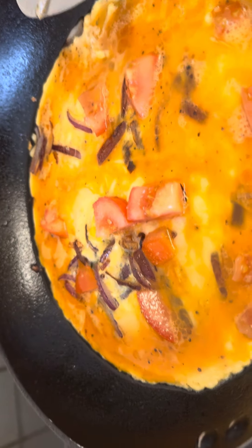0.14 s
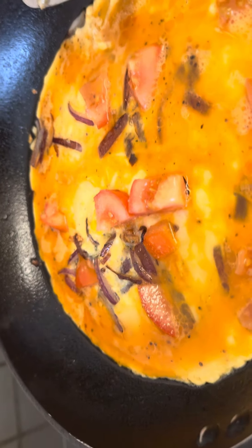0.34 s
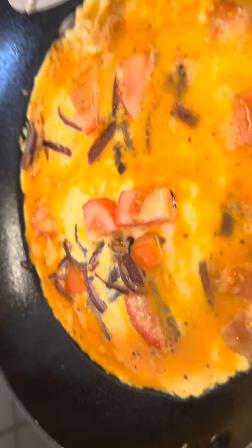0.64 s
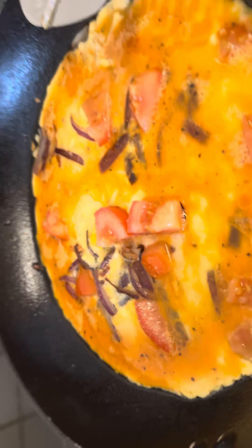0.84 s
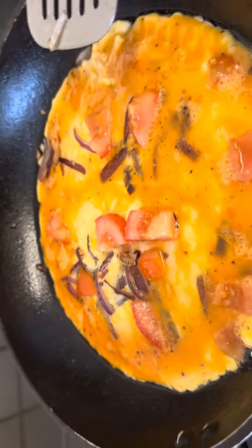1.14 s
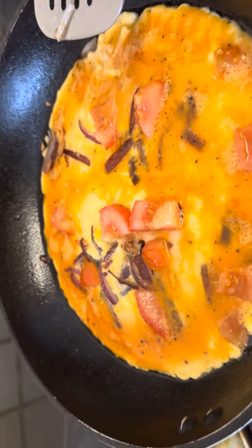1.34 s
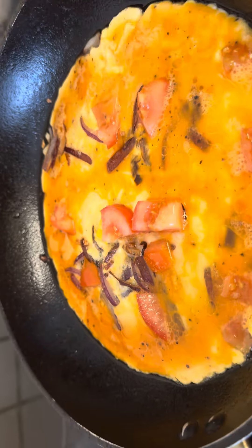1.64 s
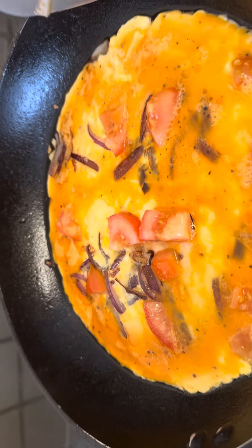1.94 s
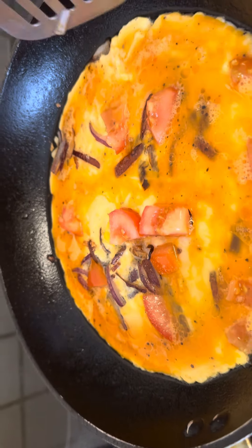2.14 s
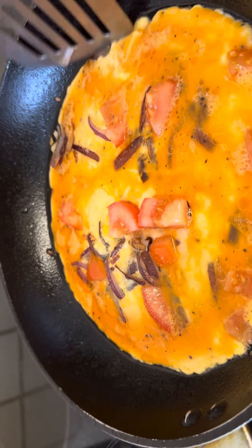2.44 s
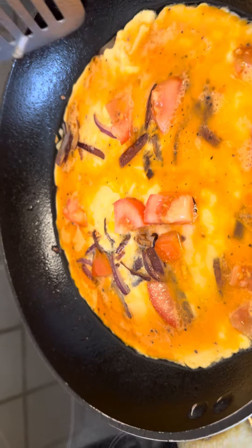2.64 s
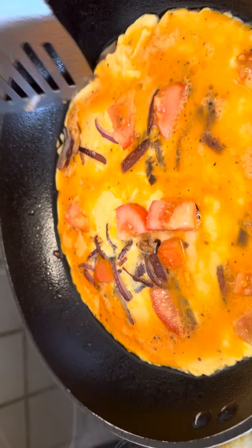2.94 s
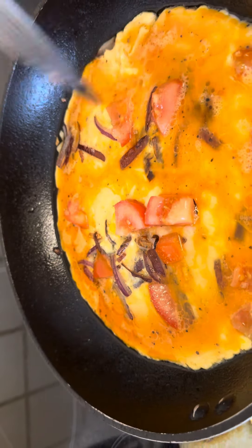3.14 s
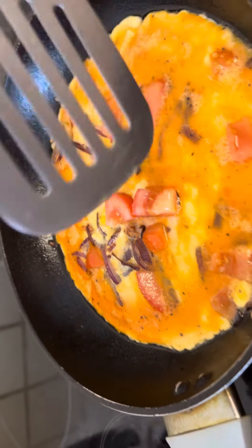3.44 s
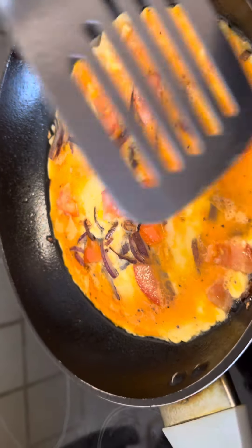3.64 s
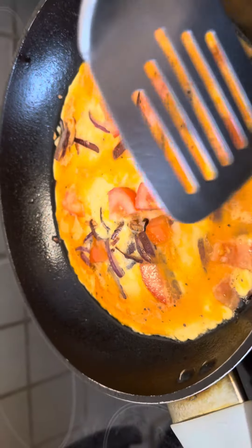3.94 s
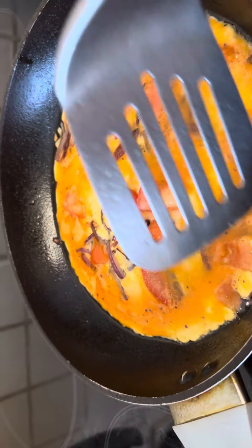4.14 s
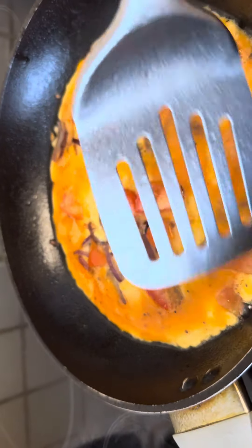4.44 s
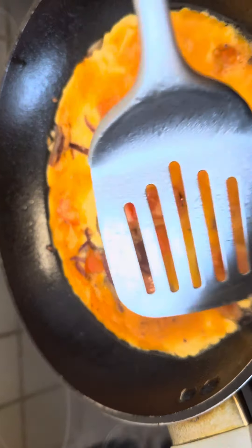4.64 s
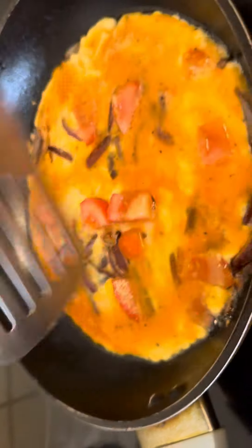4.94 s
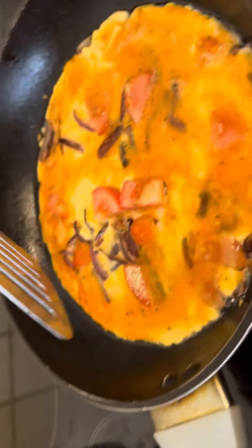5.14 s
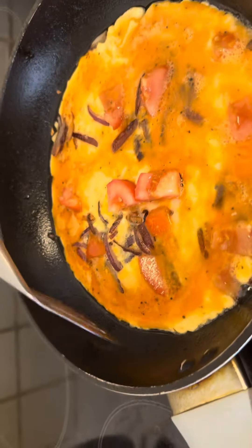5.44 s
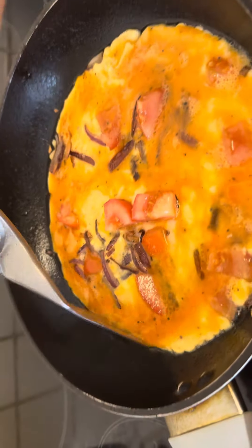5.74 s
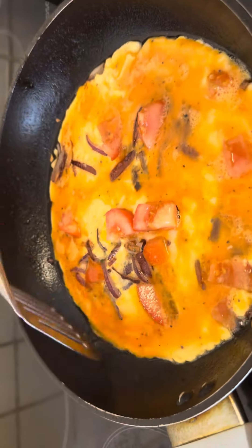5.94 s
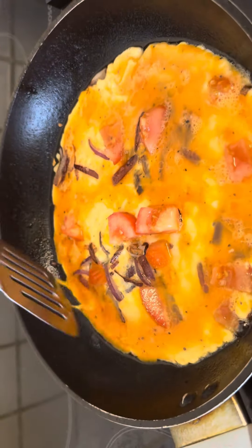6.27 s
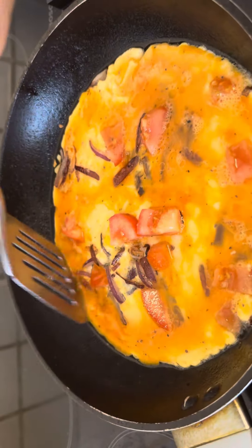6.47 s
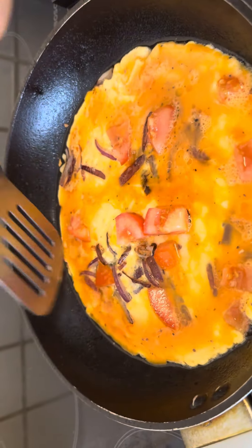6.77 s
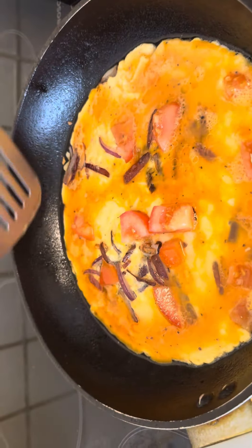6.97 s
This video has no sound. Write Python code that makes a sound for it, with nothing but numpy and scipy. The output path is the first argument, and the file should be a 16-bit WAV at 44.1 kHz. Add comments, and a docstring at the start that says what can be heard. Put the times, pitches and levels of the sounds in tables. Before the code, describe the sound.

Steady light sizzling with small snaps and spits, heard very close in stereo, above a dull electrical hum and soft fan. After about two seconds of mostly frying, a spatula taps the pan in clusters, with brief gritty scrapes under the egg and dull thumps of the pan on the hob. The last knocks are loudest, then frying alone.

```python
"""An omelette fries in a nonstick pan in a small kitchen: steady hob hum (sines) and fan rush (noise) run
throughout, under sizzle made of flickering noise bands, random clicks and pings. Low bumps, dry ticks, a
noise brush and bubble pops (snap, ping, spit) start within 0.3 s. From 2 s a slotted spatula knocks on the pan
(pulses into ringing modes), clinks once and scrapes under the egg (stick-slip clicks) until just before the end.
Two close microphone ports hear the low end alike and the top treble near opposite phase."""
import sys
import numpy as np
from scipy import signal
from scipy.fft import rfft, irfft, next_fast_len
from scipy.io import wavfile

SR = 44100
rng = np.random.default_rng(int(sys.argv[2]) if len(sys.argv) > 2 else 0)


def dump_mix(stems):
    """Bounce the given channels to the path in sys.argv[1] as a 16-bit WAV at rate SR."""
    frames = np.atleast_2d(stems).T  # one column per channel
    limited = np.clip(frames, -1, 1)  # hard clip at full scale
    pcm = np.round(limited * 32767).astype(np.int16)
    wavfile.write(sys.argv[1], SR, pcm)


N = 313551
TIME = np.arange(N) / SR
TAPS = 8192
BINS = np.fft.rfftfreq(TAPS, 1 / SR)

# Event-table levels are relative: each function adds its own trim.
# strokes of the blade under the egg: (start [s], length [s], level [dB], centre of the rubbing noise [Hz],
# pitch of the blade's song [Hz], song [dB], edge scratch [dB], low pan shudder [dB], shift of the frying [dB])
STROKES = [(2.306, 0.12, -38, 600, 480, -2, -14, -38, -1), (2.632, 0.13, -38, 547, 513, -8, -24, -50, 0.5),
           (2.74, 0.11, -30, 700, 490, -16, -22, -48, 1.5),
           (3.774, 0.058, -36, 420, 520, -12, -23, -40, -1.5),
           (3.854, 0.085, -28, 380, 440, -5, -22.5, -35, 12),
           (4.537, 0.077, -29, 380, 430, -11, -33, -33, 1.5),
           (5.681, 0.05, -23, 456, 457, -6.5, -12.5, -28, 0.5)]
# how strongly the pan radiates a push: (frequency [Hz], level [dB])
PAN_RADIATION = [(25, -2), (60, 8.5), (140, 9.5), (230, 7), (330, 2.5), (480, 5.5), (600, 2), (790, 1.5),
                 (1030, 0), (1450, 0), (1900, -2), (2600, -6), (3200, -11.5), (6000, -31)]
# the spatula works at the far wall, then on the egg, then at the near wall: the two moves (time [s])
MOVE_TIMES_S = (3.3, 5.0)


def amp(db):
    """Decibels to gain."""
    return 10 ** (np.asarray(db) / 20)


def evened(x):
    """Scales to rms 1."""
    return x / np.sqrt(np.mean(x ** 2) + 1e-20)


def peaked(x):
    """Scales to peak 1."""
    return x / np.max(abs(x))


def read(points, hz):
    """Reads a table on a log-frequency axis."""
    f, value = np.transpose(points)
    return np.interp(np.log(hz + 1), np.log(f + 1), value)


def add(mix, s, sound):
    """Mixes a sound in at time s."""
    part = mix[..., max(round(s * SR), 0):][..., :sound.shape[-1]]
    part += sound[..., :part.shape[-1]]


def panned(x, left_db):
    """A sound louder at one port than at the other by left_db."""
    return amp([[left_db / 2], [-left_db / 2]]) * x


def convolve(x, response):
    """Passes a sound through an impulse response, keeping its length."""
    return signal.fftconvolve(x, response)[:len(x)]


def causal(db):
    """Minimum-phase spectrum with these levels on BINS, floored 80 dB below the top."""
    log_gain = np.log(amp(np.maximum(db, db.max() - 80)))
    mirrored = np.r_[log_gain, log_gain[-2:0:-1]]
    return np.exp(np.conj(signal.hilbert(mirrored)))[:len(BINS)]


def band(x, low_hz, high_hz):
    """A band of a sound, at rms 1."""
    sos = signal.butter(3, [low_hz, high_hz], "band", fs=SR, output="sos")
    return evened(signal.sosfilt(sos, x))


def resonate(x, hz, width):
    """A resonance of gain 1, width in Hz, whose pitch can follow a curve."""
    turn = np.exp(2j * np.pi * np.cumsum(hz * np.ones(len(x))) / SR)
    r = np.exp(-np.pi * width / SR)
    # shift the pitch to 0 Hz, low-pass, shift back
    return 2 * (turn * signal.lfilter([1 - r], [1, -r], x / turn)).real


def dying(t, t60):
    """An envelope that falls 60 dB in t60."""
    return np.exp(-np.log(1000) * t / t60)


def ring(modes):
    """Half a second of struck modes (Hz, dB, t60 s)."""
    t = TIME[:SR // 2]
    return sum(amp(db) * dying(t, t60) * np.cos(2 * np.pi * hz * t) for hz, db, t60 in modes)


def drift(per_s):
    """A slow random curve of rms 1 with per_s knots a second."""
    knots = np.arange(0, TIME[-1] + 1, 1 / per_s)
    return evened(np.interp(TIME, knots, rng.standard_normal(size=2000)[:len(knots)]))


def grains(per_s, spread_db):
    """Random clicks at rms 1; their sizes spread exponentially in dB."""
    size = amp(spread_db * np.minimum(rng.exponential(1, N), 5)) * rng.choice([-1, 1], N)
    return evened(size * (rng.random(N) < per_s / SR))


def scattered(*ranges, count):
    """Event rows at random times, each further column drawn from its range."""
    low, high = np.transpose([(0, TIME[-1]), *ranges])
    return (low + (high - low) * rng.random((count, len(low)))).tolist()


def echoes(decay, gap_s):
    """Dense reflections of energy 1, each band dying at its own speed."""
    hz, t, z = signal.stft(rng.standard_normal(SR // 2), SR, nperseg=256)
    tail = signal.istft(z * dying(t, read(decay, hz)[:, None]), SR, nperseg=256)[1]
    tail *= 1 - np.exp(-(TIME[:len(tail)] / gap_s) ** 2)
    return tail / np.linalg.norm(tail)


def kitchen(x, wet_db, apart_db):
    """Adds the room: a reverberation both ports share, and one of opposite sign at each."""
    # reverberation: (frequency [Hz], t60 [s])
    room_t60 = [(80, 0.24), (300, 0.26), (1000, 0.26), (3000, 0.26), (7000, 0.3), (15000, 0.0069)]
    source = np.atleast_2d(x).mean(axis=0)
    shared, apart = (convolve(source, echoes(room_t60, gap_s=0.00027)) for _ in range(2))
    return x + amp(wet_db) * (shared + amp(apart_db) * np.array([apart, -apart]))


def hob():
    """Hum partials wavering in phase and level, in the coloured-noise rush of a fan."""
    # hum of the hob and its fan: (frequency [Hz], level [dB rms])
    hum_partials = [(100, -52.5), (152, -55.5), (200, -64), (241, -62), (457, -73.5), (495, -83.5)]
    # rush of the fan: (frequency [Hz], relative density [dB per Hz])
    fan_colour = [(20, -30.5), (35, -21), (50, 5), (72, 1.5), (125, -3.5), (170, 2), (245, -1.5),
                  (275, -4.5), (380, -14.5), (510, -7), (600, -21.5), (1000, -18), (2000, -51), (5000, -79)]
    hum = 0
    for hz, db in hum_partials:
        phase = 2 * np.pi * hz * TIME + 0.91 * drift(per_s=3.9)
        hum = hum + amp(db) * evened(np.sin(phase) * amp(1.66 * drift(per_s=6)))
    rush = evened(convolve(rng.standard_normal(N), irfft(causal(read(fan_colour, BINS)))))
    return hum + kitchen(amp(-55.0) * rush, wet_db=-4.5, apart_db=-1.0)


def fizz():
    """Fine hiss of steam: noise that flickers separately in every band."""
    edges_hz = np.linspace(200, 16400, num=15)
    return evened(sum(band(rng.standard_normal(N), low, high) * amp(2.7 * drift(per_s=40))
                      for low, high in zip(edges_hz, edges_hz[1:])))


def bubbles():
    """Swarms of tiny bubbles, each size pinging for some cycles at its own pitch."""
    t = TIME[:TAPS // 16]
    swarms = 0
    for hz in np.geomspace(4800, 10500, num=8):
        ping = np.sin(2 * np.pi * hz * t) * dying(t, t60=38 / hz)
        swarms = swarms + signal.oaconvolve(grains(per_s=31, spread_db=0.0), ping)[:N]
    return evened(swarms)


def frying_db(shift_rise_s=0.049, shift_fade_s=0.14):
    """The frying swells slowly; each stroke pressing wet egg on the hot pan briefly flares or dips it."""
    # slow swell: (time [s], relative level [dB])
    heat = [(0.0, -59), (0.45, -56.5), (1.25, -61.5), (2.25, -58.5), (3.1, -60), (3.3, -62.5), (3.7, -61.5),
            (4.05, -60), (4.8, -58.5), (5.5, -56), (7.11, -57)]
    db = np.interp(TIME, *np.transpose(heat))
    for s, length, *_, shift_db in STROKES:
        t = np.maximum(TIME - s, 0)
        fade = np.exp(-(np.maximum(t - length, 0) / shift_fade_s) ** 2)
        db = db + shift_db * (1 - np.exp(-t / shift_rise_s)) * fade
    return db


def sizzle():
    """A fine fizz of steam, a crackle of bursting films and tiny bubble pings, rung by hollows."""
    # colour of the frying: (frequency [Hz], relative density [dB per Hz])
    fry_colour = [(300, 7), (1000, -3), (2300, -1.5), (3600, -5), (5600, -4.5), (7500, -0.5), (9300, -2.5)]
    # its faint top octave: (frequency [Hz], relative density [dB per Hz])
    top_colour = [(10600, -3), (12000, -10), (13300, -8), (15600, -7), (16200, -24)]
    # hollows under the egg that the frying rings: (frequency [Hz], width [Hz], level [dB])
    hollows = [(4960, 61, -17), (6270, 980, -3.5)]
    crackle = grains(per_s=540, spread_db=7.0)
    fry = fizz() + amp(-5.5) * crackle + amp(-11.5) * bubbles()
    fry = fry + sum(amp(db) * resonate(fry, hz, width) for hz, width, db in hollows)
    fry = evened(convolve(fry, irfft(causal(read(fry_colour + top_colour, BINS)))))
    return kitchen(fry * amp(frying_db() + 1.0), wet_db=-21.5, apart_db=-40.0)


def bumps():
    """Dull, soft bumps: a few slow cycles each under a Gaussian envelope."""
    # (envelope peak [s], level [dB], pitch [Hz])
    low_bumps = [(0.024, -44, 85), (0.47, -44.5, 90), (0.526, -44, 66), (0.595, -36, 72.5), (0.66, -44, 70),
                 (2.265, -38.5, 64)]
    width_s = 0.019
    out = 0
    for s, db, hz in low_bumps:
        t = TIME - s
        out = out + amp(db) * np.exp(-(t / width_s) ** 2) * np.sin(2 * np.pi * hz * t)
    return out


def ticks():
    """Short dry clicks that crumble for a few milliseconds, with no ring."""
    # from the setting egg: (time [s], level [dB], centre [Hz], spread [octaves])
    egg_ticks = [(0.138, -27.5, 610, 0.9), (0.399, -35.5, 450, 0.6), (0.652, -38, 1120, 0.16),
                 (0.746, -35, 2450, 0.36), (0.857, -37.5, 580, 0.55), (1.053, -35, 600, 0.68),
                 (1.173, -35.5, 4000, 0.73), (1.219, -39.5, 1680, 0.66), (1.7346, -27.5, 2720, 0.54),
                 (1.788, -42, 1500, 0.7), (1.935, -41.5, 1090, 0.4), (4.851, -32.5, 785, 1.1),
                 (4.919, -38.5, 596, 0.72), (5.145, -27.5, 680, 1.18), (5.298, -25.5, 3160, 0.98),
                 (6.151, -31.5, 2580, 0.3)]
    out, t = np.zeros(N), TIME[:TAPS]
    for s, db, hz, octaves in egg_ticks:
        colour_db = -9 * np.hypot(1, np.log2((BINS + 1) / hz) / max(octaves, .2)) ** 0.95
        click = peaked(irfft(causal(colour_db)))
        crumble = rng.standard_normal(TAPS) * dying(t, t60=0.022)
        crumbled = convolve(click, crumble / np.linalg.norm(crumble))
        add(out, s, amp(db - 4.5) * (click + amp(-1.0) * crumbled))
    return kitchen(out, wet_db=-11, apart_db=-7.5)


def brush():
    """The blade brushes the egg lightly, once: a noise swish that rises quickly and dies away."""
    start_s, level_db, rise_s, t60_s = 0.242, -45, 0.025, 0.33
    t = np.maximum(TIME - start_s, 0)
    swish = band(rng.standard_normal(N), low_hz=870, high_hz=3300)
    return amp(level_db) * np.minimum(t / rise_s, 1) * dying(t, t60_s) * swish


def pops():
    """A film snaps and spits, and the bubble's hollow pings for a few milliseconds."""
    # larger bubbles in the fat: (time [s], level [dB], pitch [Hz], ring width [Hz], film snap [dB])
    large_pops = [(0.259, -32, 7260, 3000, -40.5), (0.609, -39, 4930, 800, -54),
                  (0.7468, -22, 5570, 1490, -41), (0.757, -32, 6000, 3000, -41),
                  (0.9733, -32, 6260, 500, -68), (1.581, -35, 4850, 500, -37),
                  (1.71, -42, 7100, 3000, -35.5), (1.7337, -29.5, 3920, 560, -54),
                  (2.306, -31.5, 8300, 2000, -45), (2.3907, -22, 6160, 2230, -67),
                  (2.81, -28.5, 5250, 910, -77), (2.9327, -28, 5230, 1100, -60),
                  (3.0181, -29, 6440, 2500, -37), (3.065, -29, 5240, 710, -50),
                  (3.184, -37, 5400, 910, -48), (3.7743, -32.5, 3720, 1500, -53),
                  (4.0968, -35, 6100, 1200, -41), (4.76, -39, 6940, 1480, -43),
                  (4.8922, -57, 8650, 1500, -37), (5.021, -52, 9050, 1500, -41),
                  (5.078, -38, 7250, 600, -62), (5.438, -33, 6630, 1400, -39),
                  (5.592, -37, 7000, 2940, -35), (5.609, -29, 5700, 3000, -31.5),
                  (5.7, -24.5, 5150, 1100, -65), (5.81, -30.5, 7440, 1600, -46),
                  (5.869, -34, 2700, 3000, -48), (6.002, -31, 6400, 600, -68),
                  (6.209, -22.5, 3970, 2240, -43), (6.248, -32, 4660, 1800, -44),
                  (6.346, -30, 4780, 260, -47), (6.7685, -34.5, 8350, 1200, -41),
                  (6.816, -30.5, 7700, 1110, -47), (6.859, -25, 4720, 554, -40)]
    # smaller bubbles at random: ranges of level [dB], pitch [Hz], ring width [Hz], film snap [dB]
    small_pops = scattered((-58, -39), (4800, 8800), (400, 1500), (-72, -58), count=36)
    # film snap: (frequency [Hz], relative level [dB])
    snap_colour = [(600, -15), (2500, -2.0), (6000, 2.0), (9000, 11.5), (12000, -6.0), (16000, 8.5)]
    out, t = np.zeros((2, N)), TIME[:TAPS // 4]
    snap = peaked(irfft(causal(read(snap_colour, BINS))))
    for s, db, hz, width, snap_db in large_pops + small_pops:
        ping = peaked(np.sin(2 * np.pi * hz * t) * t * np.exp(-np.pi * width * t / 2))
        spit = rng.standard_normal(len(t)) * dying(t, t60=0.022)
        spit = peaked(resonate(resonate(spit, hz, width), hz, width=2 * width))
        add(out, s + 0.00029, amp(db - 10.5) * (ping + amp(4.0) * spit))
        add(out, s + 0.00027, panned(amp(snap_db + 12.0) * snap, left_db=rng.choice([-1, 1]) * 6.7))
    return kitchen(out, wet_db=-11.0, apart_db=-2.5)


def blow(hz, octaves, dip_hz, slope_db=9):
    """A contact pulse spread by the pan, high bending waves before low: (modal drive, direct sound)."""
    # pitches the contact point leaves out: (multiple of the lowest, depth [dB], half width [octaves])
    dips = [(1, -19, 0.16), (2.08, -11, 0.11), (3.6, -12, 0.09)]
    dip_share_in_drive = 0.23
    distance = np.log2((BINS + 1) / hz) / max(octaves, .2)
    db = -slope_db * (np.hypot(1, distance) ** 0.74 - 1) + read(PAN_RADIATION, BINS)
    dip_db = sum(depth * np.exp(-(np.log2((BINS + 1) / (k * dip_hz)) / wide) ** 2) for k, depth, wide in dips)
    delay_s = 0.001882 * 1000 / (BINS + 70)
    spread = np.exp(-2j * np.pi * np.cumsum(delay_s) * SR / TAPS)
    return peaked(irfft(np.array([causal(db + dip_share_in_drive * dip_db), causal(db + dip_db)]) * spread))


def bounce(s):
    """The pan, struck at time s, bounces once on the hob and rocks to rest."""
    # bounce: (frequency [Hz], level struck at far wall [dB], on egg [dB], at near wall [dB])
    bounce_modes = [(59.3, -5, -6, -18), (79.8, 1, -9, 1), (133.8, -0.5, 10, 1.5)]
    # rocking on afterwards: (frequency [Hz], level [dB], t60 [s])
    rocking = [(46, -22, 0.35), (81, -9, 0.27), (135, -14, 0.22)]
    t, place = TIME[:SR // 2], np.searchsorted(MOVE_TIMES_S, s)
    rise, since = t / 0.021, t - .031
    thump = sum(amp(levels[place]) * np.cos(2 * np.pi * hz * since) for hz, *levels in bounce_modes)
    rock = sum(amp(db) * dying(since, t60) * np.cos(2 * np.pi * hz * since) for hz, db, t60 in rocking)
    return peaked(thump * (rise * np.exp(1 - rise)) ** 4 + rock * (1 - np.exp(-rise ** 2)))


def pan_ring(push, s):
    """The pan's modes answer a push at time s, weighted by place and varied at random."""
    # modes: (frequency [Hz], t60 [s], level struck at far wall [dB], on egg [dB], at near wall [dB])
    pan_modes = [(197, 0.25, 0, 1, -7), (234, 0.25, -2, 2, -12), (263, 0.28, 2, -9, -1),
                 (313, 0.28, -3, 0, 2), (365, 0.32, 8, 0, 7), (436, 0.26, -12, 3, 1),
                 (460, 0.22, -4, -14, 3), (492, 0.18, 5, -6, -14), (521, 0.17, 2, 4, -18),
                 (595, 0.22, 4, -6, -5), (635, 0.18, -8, 2, -10), (675, 0.24, -6, -4, -5),
                 (733, 0.17, 0, -8, 3), (776, 0.14, 5, 12, 1), (832, 0.11, -8, -1, 0),
                 (880, 0.1, -6, -3, 0), (1112, 0.22, -2, -5, -12), (1204, 0.24, -6, -14, -6),
                 (1389, 0.3, -4, 1, -11), (1448, 1.1, -8, -12, -14), (1714, 0.13, -12, -10, -4),
                 (1785, 0.16, -6, -12, -5), (2180, 0.15, 0, -4, -4), (2450, 0.14, 8, -8, -1),
                 (3010, 0.1, 0, 2, 4)]
    # dense, well damped modes of the loaded pan: (frequency [Hz], t60 [s])
    dense_t60 = [(150, 0.28), (800, 0.097), (3000, 0.056)]
    # their level: (at far wall [dB], on egg [dB], at near wall [dB])
    dense_levels_db = (-8.5, -9.5, -8.5)
    push, place = np.r_[push, np.zeros(SR // 2)], np.searchsorted(MOVE_TIMES_S, s)
    modes = [(hz, levels[place] + rng.uniform(-4, 3), t60) for hz, t60, *levels in pan_modes]
    shared, apart = (convolve(push, echoes(dense_t60, gap_s=0.0033)) for _ in range(2))
    dense = shared + amp(-2.5) * np.array([apart, -apart])
    return amp(-55.0) * convolve(push, ring(modes)) + amp(dense_levels_db[place]) * dense


def pressure_db(t, length):
    """Blade pressure t seconds into a stroke: bites in from a light touch, holds, lets go."""
    touch_db, bite_s, release_db_per_s = -30.5, 0.027, 506
    return touch_db * np.exp(-np.maximum(t, 0) / bite_s) - release_db_per_s * np.maximum(t - length, 0)


def scrapes():
    """The edge sticks, slips and chatters under the egg; on release the noise darkens and the pan jolts."""
    # resonances of the blade pressed on the pan: (frequency [Hz], width [Hz], relative level [dB])
    pressed_blade = [(1630, 72, -9), (1820, 420, 7), (2330, 120, 1)]
    catches_per_s, chatter_db = 45, -1
    sag_octaves_per_s = 25.5
    tremble_db, jolt_lag_s, jolt_s = -12, 0.0281, 0.0034
    out = np.zeros((2, N))
    chatter = np.sin(2 * np.pi * np.cumsum(catches_per_s * (1 + 0.353 * drift(per_s=30))) / SR)
    grip = amp(2.2 * drift(per_s=170))
    slips = grip * amp(chatter_db * chatter) * grains(per_s=520, spread_db=1.3)
    slips = convolve(slips, irfft(causal(read(PAN_RADIATION, BINS))))
    scratch = sum(amp(db) * resonate(slips, hz, width) for hz, width, db in pressed_blade)
    scratch = band(scratch, low_hz=1160, high_hz=2520)
    shudder = band(slips, low_hz=45, high_hz=226)
    for s, length, db, hz, song_hz, song_db, scratch_db, low_db, _ in STROKES:
        t = TIME[:int(length * SR) + TAPS // 2]
        at = int(s * SR) + np.arange(len(t))
        press = amp(pressure_db(t, length))
        sag = 2 ** (-sag_octaves_per_s * np.maximum(t - length, 0))
        body = evened(resonate(resonate(slips[at], hz * sag, width=1200), hz * sag, width=900))
        song = evened(resonate(resonate(slips[at], song_hz * sag, width=44), song_hz * sag, width=580))
        rub = body + amp(song_db) * song + amp(scratch_db) * evened(scratch[at])
        # the pan trembles under the push, then jolts back just after the release
        jolt = amp(tremble_db) * np.sqrt(press) + np.exp(-((t - length - jolt_lag_s) / jolt_s) ** 2)
        stroke = amp(db - 3.0) * press * rub + amp(low_db - 3.0) * jolt * evened(shudder[at])
        stroke = stroke * signal.windows.tukey(len(t), .08)
        add(out, s, stroke)
        add(out, s, amp(-7.0) * pan_ring(stroke, s))
    return out


def spatula():
    """Brush, knocks, a clink and scrapes; knocks and scrapes ring the pan, knocks bounce it on the hob."""
    # blows and catches: (time [s], blow [dB], spectrum centre [Hz], spread [octaves], lowest pitch left out [Hz],
    # thump of the pan on the hob [dB], edge tick [dB], freedom of the pan's ring [dB])
    knocks = [(2.038, -31, 1670, 2.3, 1270, -42, -34.5, 8.5),
              (2.425, -21.5, 410, 0.42, 795, -35.5, -61, -8),
              (2.6228, -16, 1860, 0.38, 1025, -37, -47, -0.5), (2.627, -32, 514, 0.68, 352, -53, -46, 14),
              (2.757, -28.5, 620, 0.45, 1500, -54, -59, 1), (2.779, -23.5, 650, 0.45, 930, -39, -52, 0),
              (2.843, -32, 690, 0.57, 1050, -31, -69, 15), (2.861, -31, 227, 0.51, 596, -38.5, -80, 3),
              (2.945, -24, 1560, 0.94, 960, -46, -42, 5), (3.019, -18, 2420, 0.8, 844, -46.5, -51, -27),
              (3.742, -27.5, 456, 0.66, 840, -47, -60.5, 5.5), (3.814, -36.5, 590, 0.5, 990, -41, -63, -4),
              (3.887, -28.5, 430, 0.32, 885, -51, -73, 9), (3.918, -20.5, 300, 0.91, 850, -35.5, -48, -1.5),
              (4.269, -14.5, 330, 2.3, 865, -51, -45.5, 3), (4.292, -15, 382, 0.93, 1160, -45, -48.5, -8),
              (4.509, -13.5, 535, 0.84, 626, -39.5, -48.5, 3), (4.594, -22, 394, 0.26, 1110, -49, -57, -2),
              (4.63, -20, 470, 0.41, 606, -43, -62, -2.5), (5.576, -20, 740, 0.61, 526, -26.5, -51, 0),
              (5.703, -30, 597, 0.51, 1490, -55, -60, 5), (5.717, -23, 940, 0.72, 1200, -57, -47, 4.5),
              (5.739, -10, 464, 0.55, 990, -33, -38, -31), (5.977, -13, 810, 0.51, 495, -26.5, -34.5, 2.5),
              (6.108, -22, 418, 0.41, 1040, -35.5, -52.5, -9.5),
              (6.3, -11, 737, 0.43, 530, -25.5, -33.5, -2), (6.4161, -5, 684, 0.93, 1060, -34.5, -33, -7.5),
              (6.604, -5.5, 810, 0.44, 539, -28, -41.5, -1.5)]
    # the free blade clinks on the rim: (time [s], level [dB])
    clinks = [(2.039, -37)]
    # modes of the free blade: (frequency [Hz], level [dB], t60 [s])
    blade_modes = [(1125, -13, 0.2), (1564, 1, 0.1), (1810, 12, 0.032), (2062, -9, 0.13), (2455, -3, 0.12),
                   (2649, -10, 0.12), (3009, -11, 0.12), (4081, -3, 0.05), (4380, -1, 0.04),
                   (5620, -8, 0.11), (6040, 8, 0.023), (6422, -11, 0.12), (6934, -15, 1.1),
                   (7736, -15, 0.16)]
    # edge tick: (frequency [Hz], relative level [dB])
    edge_colour = [(1500, 11.5), (3200, 5.0), (6200, 8.5), (8500, 5.5), (15000, -14.0)]
    out, t = scrapes() + brush(), TIME[:TAPS]
    edge = irfft(causal(read(edge_colour, BINS)))
    for s, db, hz, octaves, dip_hz, thump_db, tick_db, ring_db in knocks:
        push, direct = amp(db - 5.5) * blow(hz, octaves, dip_hz)
        crunch = peaked(convolve(rng.standard_normal(TAPS) * t * dying(t, t60=0.02), edge))
        add(out, s, direct)
        add(out, s, amp(thump_db + 6.5) * bounce(s))
        add(out, s, panned(amp(tick_db + 12.0) * crunch, left_db=rng.choice([-1, 1]) * 3.8))
        add(out, s, amp(ring_db) * pan_ring(push, s))
    for s, db in clinks:
        add(out, s, amp(db) * ring(blade_modes))
    return kitchen(out, wet_db=-12, apart_db=-6.0)


def scene():
    """Everything at the stove."""
    return hob() + sizzle() + bumps() + ticks() + pops() + spatula()


def record(dry):
    """The ports hear the bass alike and the top treble near opposite phase; then the band limits."""
    # nominal phase by which the left port leads: (frequency [Hz], phase [rad])
    port_phase = [(20, 0), (600, -.2), (1300, .1), (4900, .15), (6200, -.7), (7600, -1.4), (9000, -2.05),
                  (10500, -2.9), (12000, -3.14), (14000, -3.3), (15600, -4.0)]
    low_cut_hz, high_cut_hz = 33, 16400
    size = next_fast_len(N + TAPS)
    hz = np.fft.rfftfreq(size, 1 / SR)
    left, right = rfft(dry, size)
    apart = hz ** 2 / (hz ** 2 + 260 ** 2)  # fades port differences out in the bass
    mid, side = (left + right) / 2, apart * (left - right) / 2
    turn = np.exp(.5j * apart * read(port_phase, hz))
    ports = irfft(np.array([(mid + side) * turn, (mid - side) / turn]), size)[:, :N]
    ports = signal.sosfilt(signal.butter(4, low_cut_hz, "high", fs=SR, output="sos"), ports)
    low_pass = signal.firwin(511, high_cut_hz, window=("kaiser", 9), fs=SR)
    return signal.oaconvolve(ports, low_pass[None], "same")


dry = scene()
out = record(dry)
dump_mix(out)
```